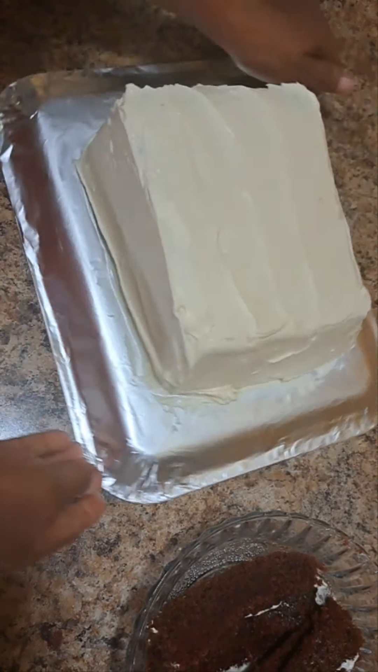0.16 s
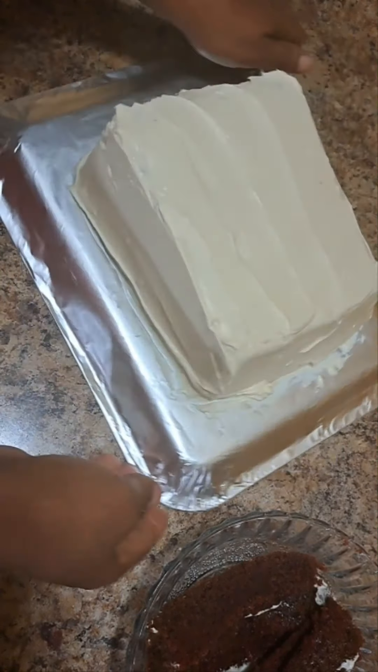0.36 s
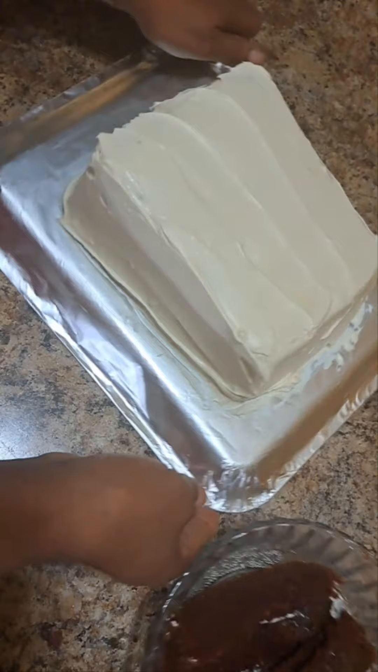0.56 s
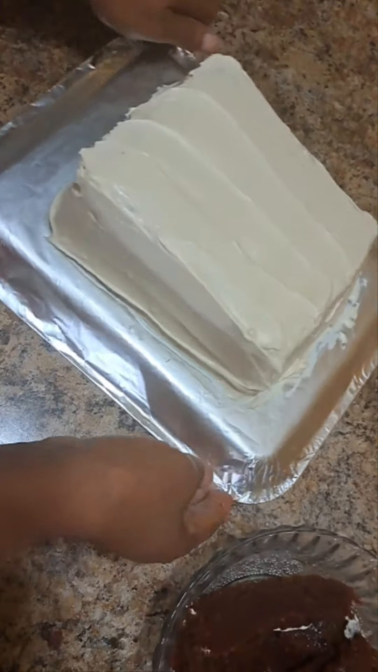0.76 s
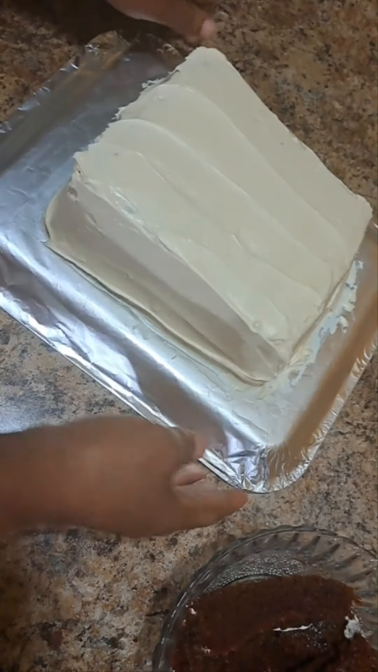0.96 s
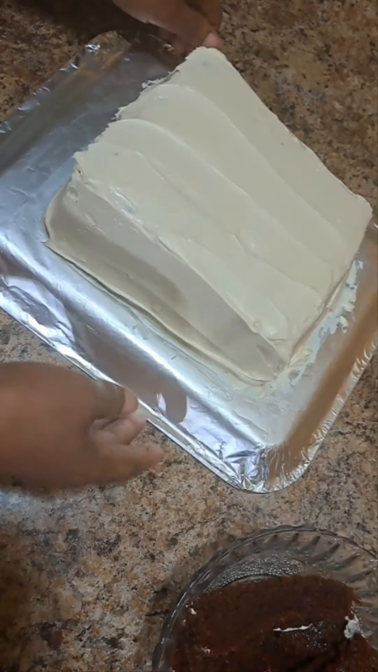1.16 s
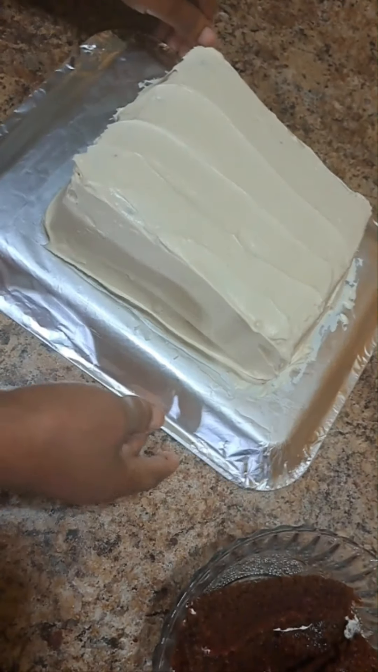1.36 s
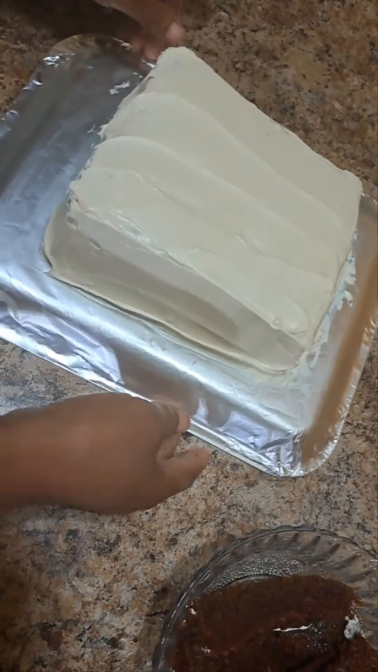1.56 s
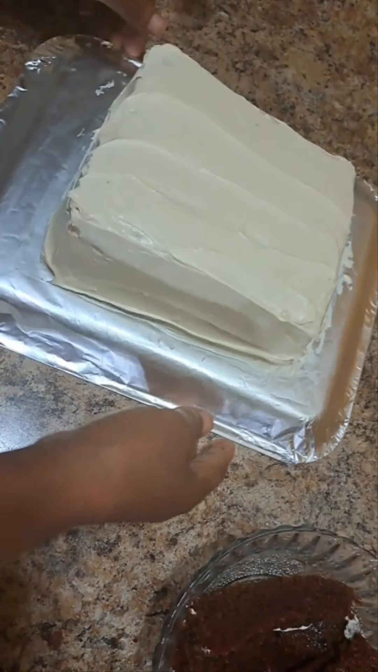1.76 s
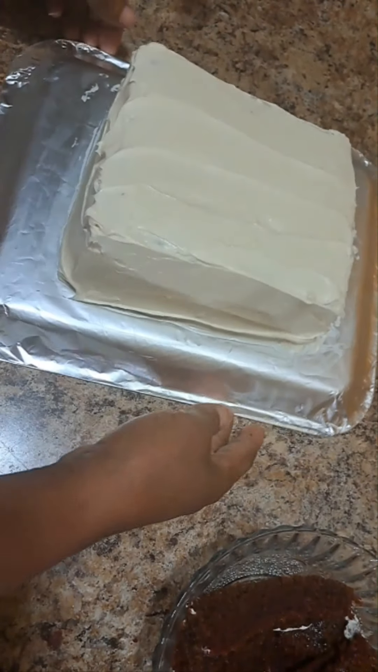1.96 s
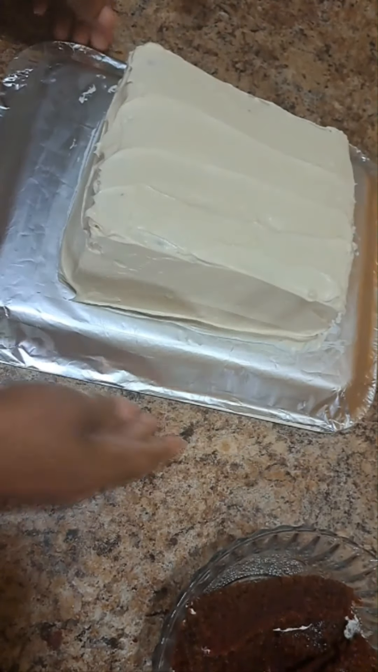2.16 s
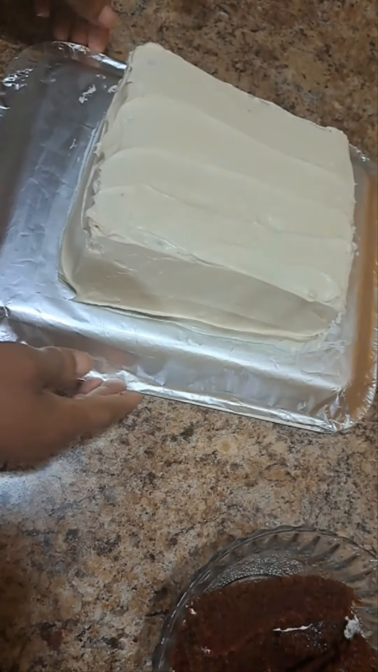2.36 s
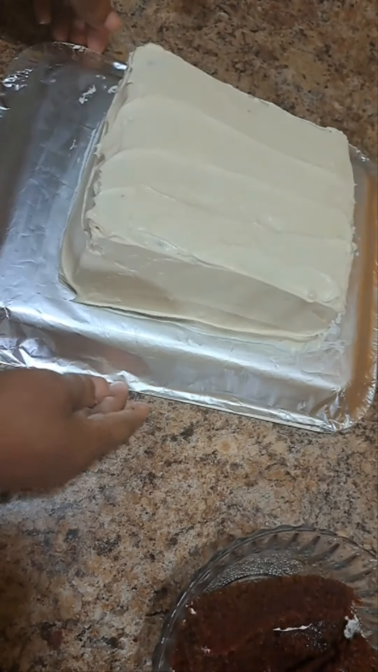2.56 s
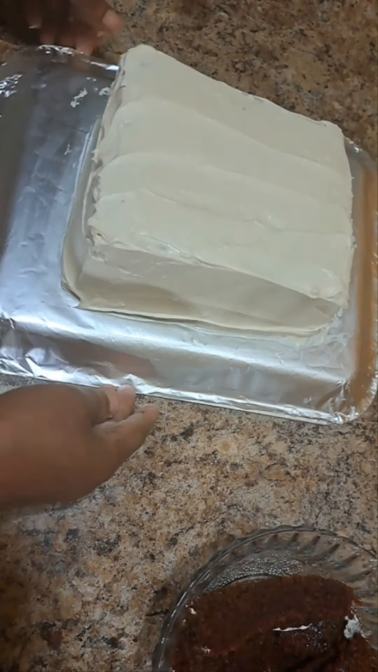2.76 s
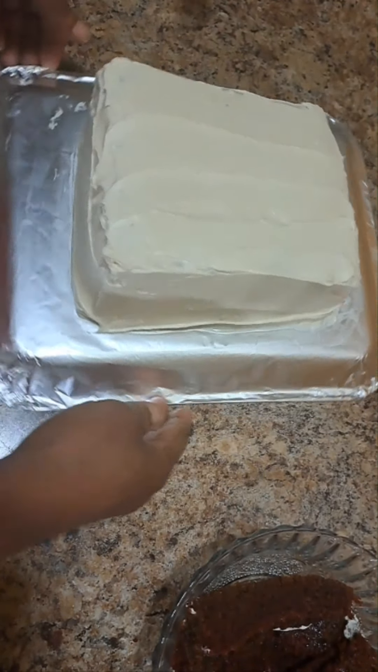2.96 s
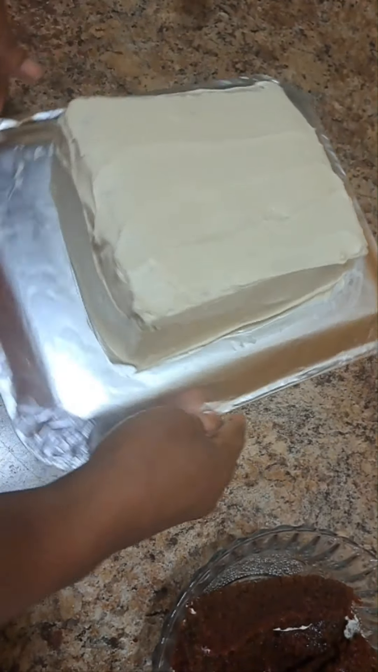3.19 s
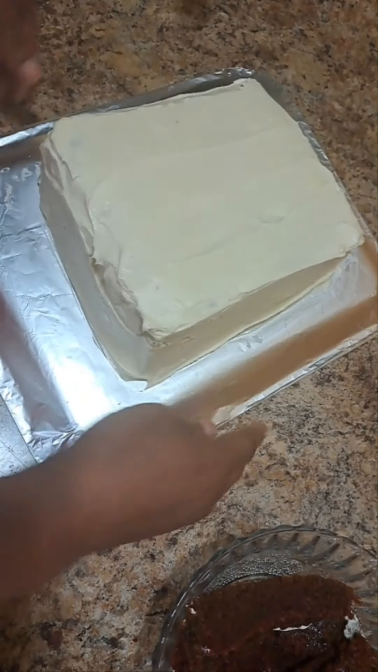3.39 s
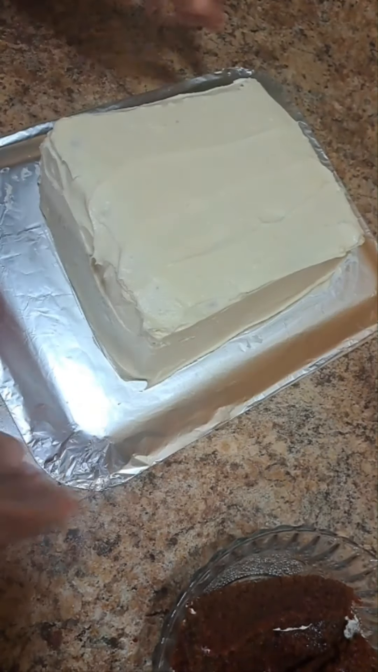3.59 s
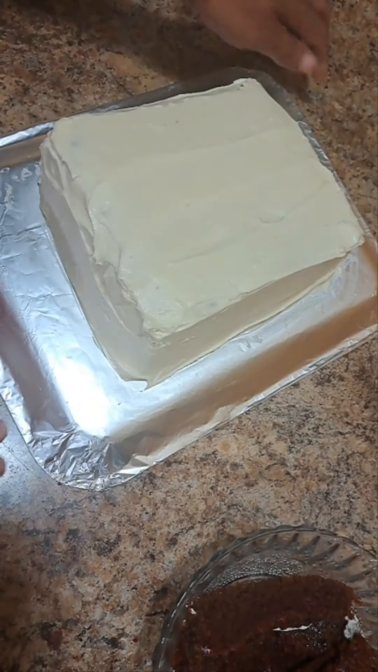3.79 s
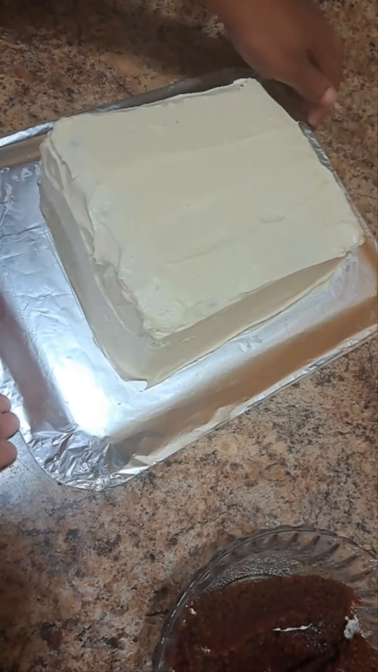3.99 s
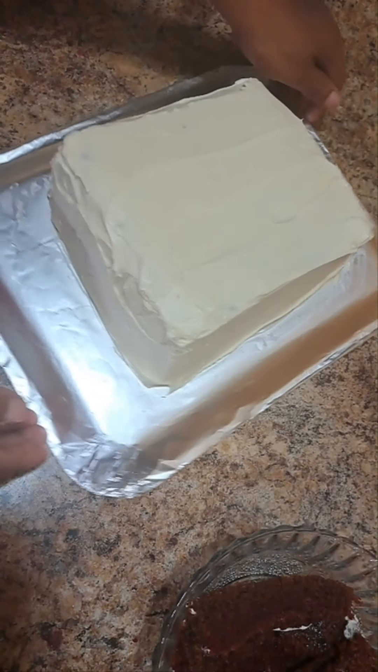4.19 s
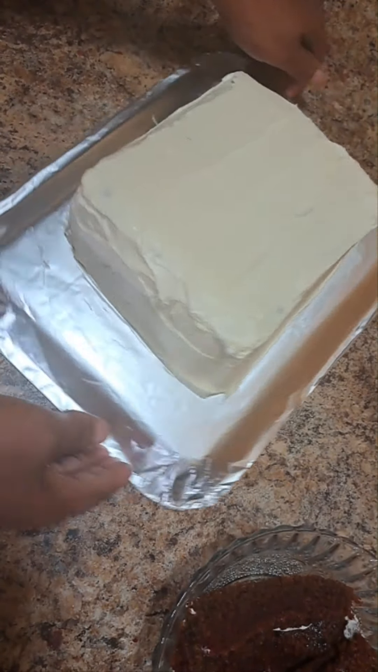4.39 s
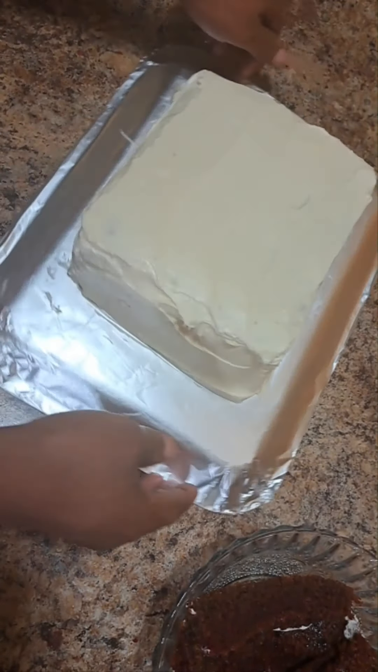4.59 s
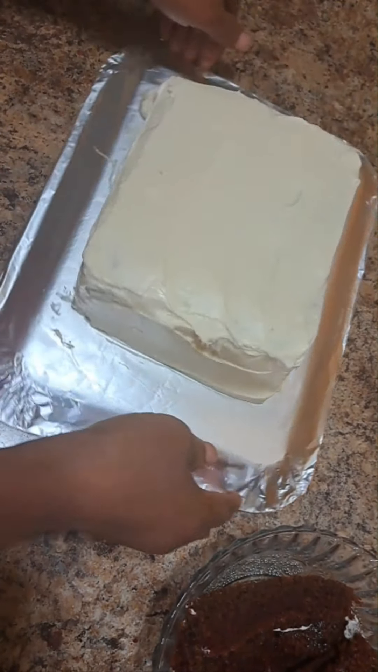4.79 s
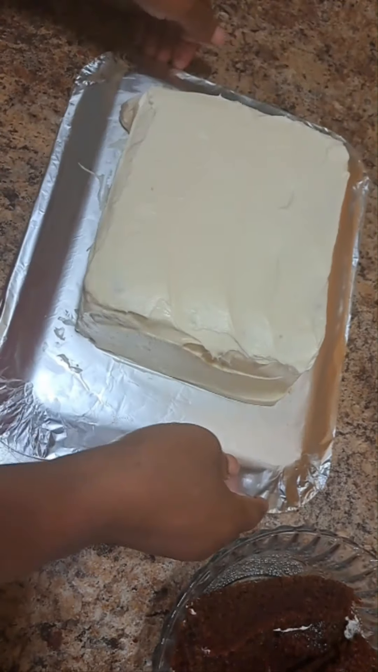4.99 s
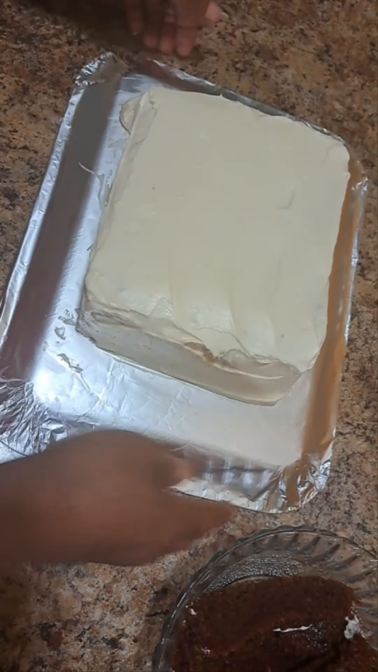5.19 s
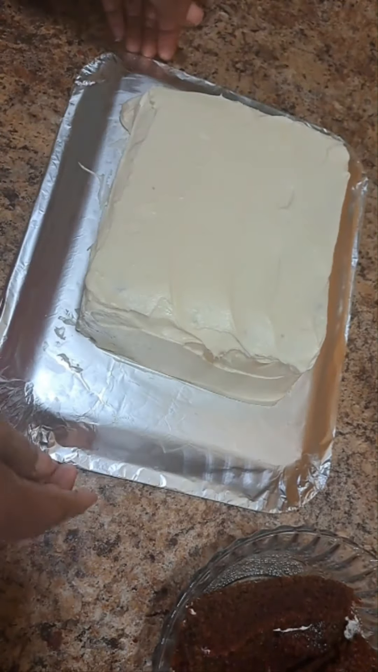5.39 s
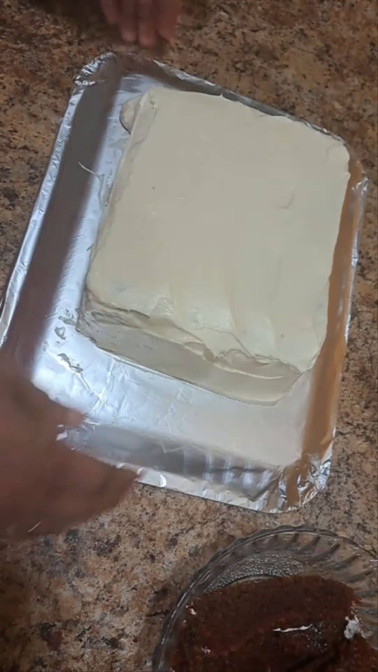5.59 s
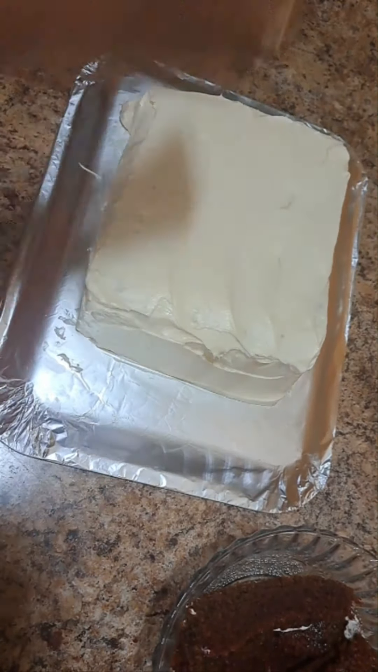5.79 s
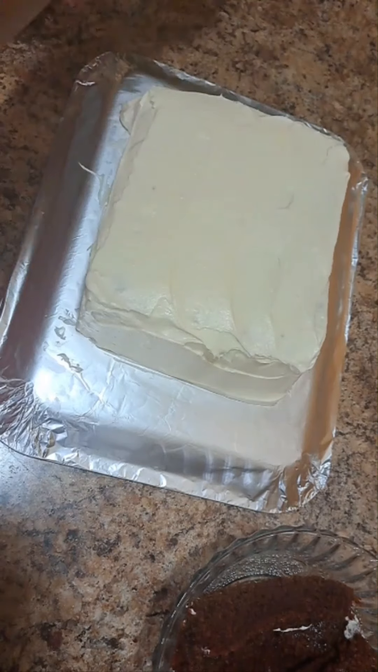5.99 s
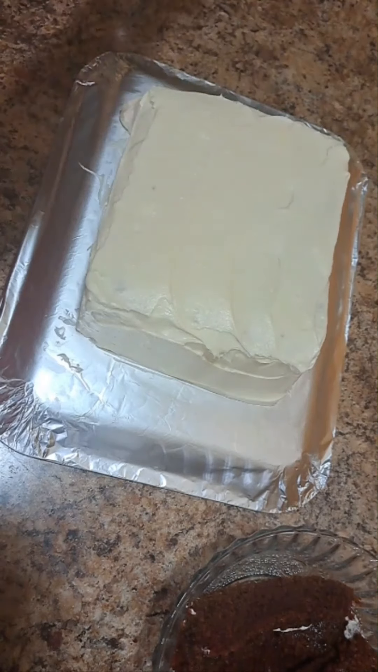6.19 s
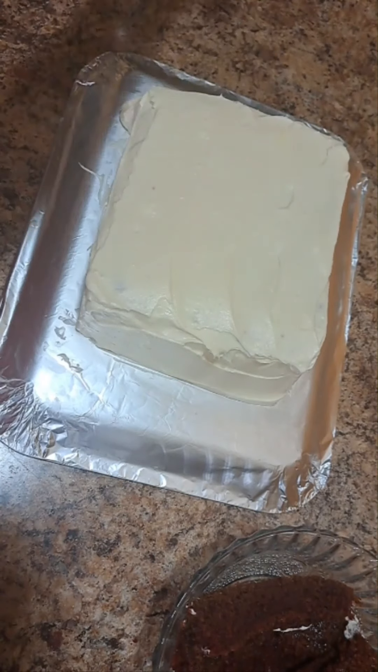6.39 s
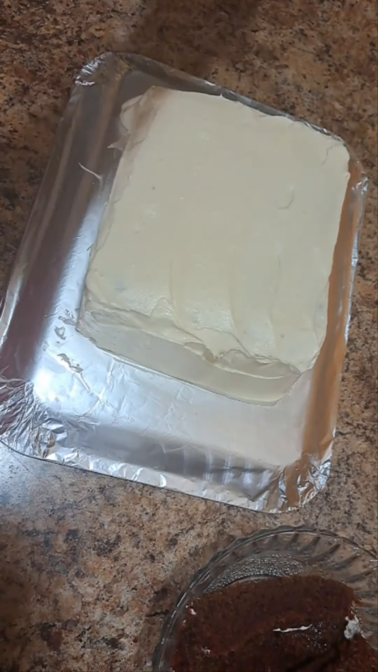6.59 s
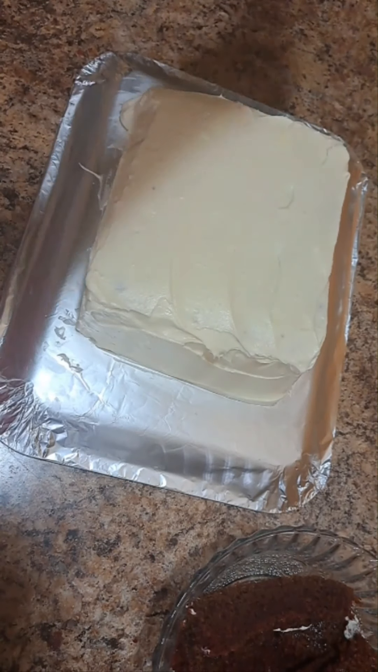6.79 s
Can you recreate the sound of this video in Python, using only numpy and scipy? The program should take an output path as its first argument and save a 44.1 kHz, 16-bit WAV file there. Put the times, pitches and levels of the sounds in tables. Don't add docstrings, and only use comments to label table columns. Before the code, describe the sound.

A foil tray holding a cake scrapes and hisses round on a stone counter, crinkling and snapping under fingers, with low thuds, then quiet.

```python
import sys
import numpy as np
from scipy import signal
from scipy.fft import rfft, irfft, next_fast_len
from scipy.io import wavfile
from scipy.ndimage import uniform_filter1d

SR = 44100
rng = np.random.default_rng(int(sys.argv[2]) if len(sys.argv) > 2 else 0)


def boost_factor(decibels):
    exponent = np.asarray(decibels, float) / 20
    return 10 ** exponent


def waveform_to_disk(signal):
    frames = np.transpose(np.atleast_2d(signal))
    scaled = np.clip(frames, -1, 1) * 32767
    samples = np.round(scaled).astype(np.int16)
    wavfile.write(sys.argv[1], SR, samples)


N = 302082
T = np.arange(N) / SR


def stereo_noise():
    return rng.standard_normal((2, N))


def level(x, db):
    return x * boost_factor(db) / np.sqrt(np.mean(x ** 2))


def decay(t, t60_s):
    return boost_factor(-60 * t / t60_s)


def pan(left_minus_right_db):
    return boost_factor(np.array([[left_minus_right_db], [-left_minus_right_db]]) / 2)


def log_axis(size):
    return np.log(np.arange(size // 2 + 1) * SR / size + 1)


def colour(x, table):
    size = next_fast_len(N)
    hz, db = np.transpose(table)
    gain = boost_factor(np.interp(log_axis(size), np.log(hz), db))
    return irfft(rfft(x, size) * gain, size)[..., :N]


def ring(x, hz, width_hz):
    return signal.lfilter(*signal.iirpeak(hz, hz / width_hz, fs=SR), x)


def ring_twice(x, hz, width_hz):
    return ring(ring(x, hz, width_hz), hz, width_hz)


def body(x, modes):
    total = 0
    for k, (hz, width_hz, db) in enumerate(modes):
        total = total + (-1) ** k * boost_factor(db) * ring_twice(x, hz, width_hz)
    return level(total, 0)


def walk(rate_hz):
    hold = int(SR / rate_hz)
    steps = np.repeat(rng.standard_normal(N // hold + 1), hold)
    return 1.01 * uniform_filter1d(steps, hold)[:N]


def curve(table):
    s, db = np.transpose(table)
    return np.interp(T, s, db)


def grit(rate_hz, spread_db, t60_s):
    sizes = boost_factor(spread_db * np.clip(rng.exponential(size=N), 0, 5.5))
    hits = (rng.random(N) < rate_hz / SR) * sizes
    pole = np.exp(-2 * np.log(1000) / (t60_s * SR))
    power = signal.lfilter([1], [1, -pole], hits ** 2)
    return level(np.sqrt(power + 1e-9), 0)


def swell(start, end, first_db, last_db, up_db_s, down_db_s):
    inside = np.interp(T, [start, max(end, start + .001)], [first_db, last_db])
    climb = up_db_s * np.clip(start - T, 0, None)
    fall = down_db_s * np.clip(T - end, 0, None)
    return boost_factor(inside - climb - fall)


# frequency in Hz, level in dB.
SIDE_OVER_MID = [(60, -13.5), (110, -16), (200, -10), (380, -8), (700, -4), (1290, 0.5), (2380, -1),
                 (4400, 0.5), (8120, 0), (15000, 0)]
# frequency in Hz, share 0-1, phase in rad.
TIED_SIDE = [(122, 0.64, -1.5), (260, 0.42, -1.5), (463, 1, 1.3), (660, 0.2, 0.5), (1030, 0.7, 1.9),
             (1660, 0, -0.5), (2920, 0, 6.5), (4870, 0, -4.5), (10300, 0.3, 7.5)]


def sides(pair, pan_db=0):
    size = next_fast_len(N)
    hz, share, phase = np.transpose(TIED_SIDE)
    share = np.clip(np.interp(log_axis(size), np.log(hz), share), 0, 1)
    phase = np.interp(log_axis(size), np.log(hz), phase)
    mid, loose = rfft(pair, size)
    mixed = share * np.exp(1j * phase) * mid + np.sqrt(1 - share ** 2) * loose
    side = colour(irfft(mixed, size)[:N], SIDE_OVER_MID)
    return np.array([pair[0] + side, pair[0] - side]) * pan(pan_db)


# full speed from and until in seconds, first and last hiss in dB, weight in dB.
PUSHES = [(0.124, 0.24, -45, -50, -9), (0.309, 0.794, -49.5, -54.5, -5.5), (0.912, 1.184, -56.5, -56.5, -4),
          (1.318, 1.492, -76, -76, 9), (1.863, 2.05, -58.5, -68, -3), (2.13, 2.24, -53, -52, -6.5),
          (2.647, 2.699, -54, -53, -10.5), (3.129, 3.476, -50, -47, -7.5), (3.515, 3.596, -48.5, -54, -4),
          (3.92, 3.94, -74.5, -81, -15), (4.593, 4.666, -48.5, -48, -5), (4.75, 5.241, -52, -55.5, -3.5),
          (5.432, 5.434, -56.5, -62.5, -12), (5.533, 5.58, -77, -79, -18), (5.86, 5.97, -71, -84, -22)]
# as for the pushes, in s, s, dB, dB, dB.
JERKS = [(0.803, 0.871, -54, -51.5, 4), (1.386, 1.41, -67, -71, 4), (1.631, 1.683, -63.5, -54, -7.5),
         (1.697, 1.807, -56, -57, -1.5), (2.333, 2.368, -63, -54, -10), (2.433, 2.5, -75, -73, 5),
         (2.573, 2.63, -60.5, -60, -3.5), (2.975, 3.053, -64, -58, -8), (3.97, 3.976, -90, -87, 19),
         (4.176, 4.19, -72, -73.5, 8.5), (4.382, 4.433, -59, -55.5, -9.5),
         (4.449, 4.522, -53.5, -50.5, -6.5), (5.64, 5.657, -66, -64.5, -4), (5.737, 5.84, -64, -76, -27)]


def pushes():
    slow_down_db_s = 159
    gains = [swell(*row[:4], 128, slow_down_db_s) for row in PUSHES]
    gains += [swell(*row[:4], 415, slow_down_db_s) for row in JERKS]
    powers = np.array(gains) ** 2
    weights = boost_factor(2 * np.transpose(PUSHES + JERKS)[4])
    return 10 * np.log10(np.array([powers.sum(axis=0), weights @ powers]) + 1e-14)


# start in seconds, length in seconds, tray dB, counter dB.
SHUDDERS = [(0.08, 0.4, -55, -60), (0.813, 0.059, -43, -47.5), (1.112, 0.0088, -54, -50),
            (1.254, 0.067, -72, -48.5), (1.38, 0.02, -56.5, -44.5), (1.657, 0.014, -57, -55),
            (2.04, 0.018, -57, -69), (2.463, 0.0088, -52.5, -50), (2.627, 0.01, -57, -49),
            (3.184, 0.042, -55, -53), (3.522, 0.046, -57, -47.5), (3.995, 0.0092, -59.5, -68),
            (4.206, 0.018, -57.5, -59), (4.47, 0.02, -52.5, -64), (4.853, 0.02, -60, -55),
            (5.203, 0.014, -55.5, -56), (5.417, 0.021, -68, -74), (5.632, 0.01, -50.5, -51),
            (5.925, 0.0087, -89, -65), (6.118, 0.0085, -92, -65), (6.24, 0.14, -69, -69.5),
            (6.531, 0.024, -48.5, -53.5), (6.838, 0.02, -89, -67)]
# time in seconds, level in dB.
LEAN = [(0.0, -51.5), (0.34, -65), (0.57, -55), (0.7, -55), (1.32, -64), (1.41, -58.5), (2.08, -58),
        (2.61, -56), (3.09, -55.5), (3.78, -67.5), (4.35, -55), (4.54, -61.5), (5.84, -69.5), (6.05, -78.5),
        (6.85, -83)]
# frequency in Hz, width in Hz, level in dB.
COUNTER_MODES = [(46.5, 17, -3), (61.8, 26, 2.5), (77.2, 21.4, -0.5), (100.2, 35, -6.5), (121.2, 32, -2),
                 (156, 44, -6.5)]
# frequency in Hz, width in Hz, level in dB.
TRAY_MODES = [(201.4, 73, -6), (287.5, 84, 3.5), (348, 49, 0), (387, 84, 2), (501.4, 76, -2),
              (670, 420, -14)]
# start in seconds, end in seconds, frequency in Hz, width in Hz, level in dB.
RINGING = [(0.0, 0.115, 298, 140, -62), (0.09, 0.167, 5260, 1800, -50), (2.57, 2.698, 900, 540, -68),
           (3.053, 3.14, 1100, 990, -74), (6.53, 6.623, 6000, 6000, -83), (4.17, 4.22, 12000, 5000, -84),
           (0.075, 0.998, 680, 250, -58.5), (0.79, 0.927, 756, 300, -61.5), (0.84, 0.978, 145, 69, -49.5),
           (0.81, 3.06, 1574, 320, -75), (3.08, 3.196, 370, 50, -61.5), (3.125, 3.214, 508, 24, -60),
           (3.137, 3.318, 1050, 330, -66), (3.25, 3.413, 498, 13, -54.5), (3.343, 3.39, 350, 76, -53),
           (3.38, 3.462, 925, 70, -58.5), (3.392, 3.485, 1410, 140, -55), (3.424, 3.516, 488.4, 6.3, -54),
           (3.466, 3.544, 1006, 130, -54), (3.477, 3.566, 331, 20, -51), (3.486, 3.557, 1440, 130, -58),
           (3.53, 3.6, 491, 30, -61), (3.66, 3.97, 8100, 850, -89), (3.903, 4.035, 282, 43, -64.5),
           (4.14, 4.216, 2570, 500, -77), (4.421, 4.514, 293, 87, -53), (4.56, 4.702, 4330, 2200, -58.5),
           (4.75, 4.812, 4400, 1800, -58), (6.48, 6.515, 504, 110, -57.5), (6.5, 6.633, 1420, 240, -76.5),
           (6.547, 6.61, 450, 170, -55), (6.648, 6.676, 1870, 940, -74.5), (6.62, 6.732, 485, 150, -75)]


def drum():
    shakes = np.array([swell(s, s + length, 0, 0, 250, 173) for s, length, *_ in SHUDDERS]) ** 2
    tray_shake, counter_shake = boost_factor(2 * np.transpose(SHUDDERS)[2:]) @ shakes
    counter_db = 10 * np.log10(counter_shake + boost_factor(2 * curve(LEAN) + 7.5))
    from_scrape = boost_factor(2 * (pushes()[1] - 0.5))
    from_counter = boost_factor(2 * (counter_db - 13))
    tray_db = 10 * np.log10(tray_shake + from_scrape + from_counter)
    counter = body(stereo_noise() * boost_factor(0.18 * walk(17)), COUNTER_MODES) * boost_factor(counter_db - 1.0)
    tray = body(stereo_noise() * grit(500, 1.87, 0.033), TRAY_MODES) * boost_factor(tray_db - 2.0)
    return sides(counter + tray + singing())


def singing():
    lead = 8192
    out, friction = np.zeros((2, N)), rng.standard_normal((2, N + lead))
    for start, end, hz, width_hz, db in RINGING:
        i = int(start * SR)
        span = slice(i, int(end * SR))
        progress = np.clip((T[span] - start) / (end - start), 0, 1)
        envelope = np.sin(np.pi * progress) ** 0.21
        note = ring_twice(friction[:, i:i + len(envelope) + lead], hz, width_hz)[:, lead:]
        out[:, span] += envelope * level(note, db)
    return out


# time in seconds, peak in dB, centre in Hz, left minus right in dB.
CLICKS = [(0.008, -46, 12000, 0), (0.119, -33.5, 5200, -5), (0.1455, -38, 13500, 0), (0.337, -36, 12500, 3),
          (0.399, -33, 9000, 0), (1.0095, -36, 7000, -2), (1.1733, -42, 9000, 2), (1.189, -50, 8500, 0),
          (1.6155, -40, 12000, 6), (1.7722, -39, 13000, 5), (1.8426, -36, 14000, -6),
          (2.1367, -36, 12500, -1), (2.3207, -39, 9000, -1), (2.3726, -31.5, 4700, 6),
          (2.595, -31.5, 12800, -1), (2.6258, -34.5, 5500, 5), (2.6825, -27.5, 13600, -4),
          (2.99, -42.5, 12800, 5), (3.325, -40, 4200, 0), (3.369, -38, 5000, -2), (3.574, -29, 11100, -1),
          (4.368, -57, 5800, -3), (4.4697, -41, 6400, 0), (4.776, -35, 4300, -2), (4.897, -41, 7000, 0),
          (5.162, -35, 8000, 0), (5.231, -41, 14000, 2), (5.2705, -34, 3620, -6), (5.381, -47, 8000, 0),
          (5.4306, -44, 6900, 0), (5.7225, -47, 13500, 0), (5.807, -51.5, 6000, -5), (5.834, -62, 4500, -5)]


def clicks():
    size = 1024
    out, t = np.zeros((2, N + size)), np.arange(size) / SR
    envelope = decay(t, 0.0083) * np.clip(t / 0.0004, 0, 1)
    for s, db, hz, pan_db in CLICKS:
        i = int(s * SR)
        noise = rng.standard_normal((2, size))
        burst = (noise + 0.91 * noise[0]) * envelope
        sound = ring(burst, hz, hz / 3.1) + 0.34 * ring(burst, 8700, 11000)
        peak = np.abs(sound).max(axis=1, keepdims=True)
        out[:, i:i + size] += boost_factor(db) * pan(pan_db) * sound / peak
    return out[:, :N]


# time in seconds, peak in dB, centre in Hz, share below 2.5 kHz in dB.
SNAPS = [(0.144, -32, 12300, -17), (0.4952, -34.5, 4600, -7.5), (1.008, -32.5, 6940, -31),
         (2.318, -29.5, 13600, -16.5), (2.347, -33, 13400, -23), (2.371, -33, 4470, -22),
         (2.528, -36, 5530, -25), (2.5317, -36.5, 12600, -21), (2.569, -29.5, 8410, -16.5),
         (2.595, -32.5, 12800, -15), (2.6246, -29, 13500, -15), (2.673, -32.5, 7500, -17),
         (2.682, -33.5, 13500, -15), (3.123, -29.5, 12900, -31), (3.5718, -27.5, 5330, -26),
         (3.596, -32, 5010, -10), (3.635, -32, 4700, -26), (3.9574, -68, 3830, -7), (4.139, -48, 8100, -30),
         (4.1475, -54, 3000, 0), (4.9915, -33.5, 11800, -32), (5.108, -34, 12900, -33),
         (5.1317, -35, 5170, -14), (5.1523, -33, 13100, -22), (5.16, -36.5, 7910, -25),
         (5.1977, -38, 12400, -18), (5.228, -37, 12900, -13), (5.2695, -33, 3530, -16),
         (5.4004, -35, 6200, -25), (5.4302, -37, 6940, -28), (5.619, -38.5, 5140, -8.5)]
# time in seconds, peak in dB, centre in Hz, left minus right in dB.
TICKS = [(1.17, -42.5, 10700, 5), (1.278, -49.5, 5250, 0), (1.3698, -48, 5900, -1), (1.381, -42, 10300, 5),
         (1.4624, -46, 5770, 2), (1.4673, -38, 5800, -3), (1.5529, -56, 10500, .6), (1.615, -45, 6400, 7),
         (1.631, -43, 5110, -1), (1.7715, -45, 5100, -1.5), (1.8415, -43, 15000, -3.5),
         (2.462, -47.5, 4990, -.6), (2.471, -46.5, 4960, 2), (2.519, -39.5, 4260, -1),
         (2.822, -55.5, 5470, -3), (3.786, -59, 11600, 7), (4.2797, -61, 8840, -1), (4.2986, -57, 7540, .6),
         (4.373, -41, 13000, 2), (4.452, -39, 12800, 1), (4.8713, -52, 11600, -3),
         (5.348, -40.5, 11800, -.6), (5.3796, -45, 5230, -8), (5.655, -48, 5290, 0),
         (5.7219, -44.5, 12700, -1), (5.8072, -54, 4890, -3), (5.814, -49.5, 12700, 1),
         (5.8324, -47.5, 5740, 2), (5.846, -48, 5840, -5), (6.526, -70, 3000, 0)]


def creases():
    big = [(s, db, hz, 0.044, low_db, -1.7) for s, db, hz, low_db in SNAPS]
    small = [(s, db, hz, 0.054, -34.5, pan_db) for s, db, hz, pan_db in TICKS]
    return sorted(big + small)


def dips_before_snaps():
    times = np.append(np.transpose(creases())[0], 99)
    until_snap_s = times[np.searchsorted(times, T)] - T
    return boost_factor(-3.2 * np.exp(-until_snap_s / 0.0071))


# frequency in Hz, density in dB per Hz.
HISS = [(2300, -35), (3650, -5.5), (5260, 1), (6470, -3.5), (8050, -3), (9030, -6.5), (12700, -0.5),
        (15000, -5), (16400, -6.5)]
# frequency in Hz, density in dB per Hz.
SCRAPE = [(360, -9), (620, -5.5), (669, -3.5), (937, -8), (1600, -12), (1950, -20.5), (2100, -12.5),
          (2730, -23.5), (4620, -120)]


def slide():
    hiss_db, scrape_db = pushes()
    hiss = level(colour(stereo_noise() * grit(2000, 2.53, 0.09), HISS), 0)
    upper = signal.sosfilt(signal.butter(2, 8500, "high", fs=SR, output="sos"), hiss)
    hiss = hiss * boost_factor(1.2 * walk(25)) + upper * (boost_factor(1.3 * walk(9)) - 1)
    scrape = level(colour(stereo_noise() * grit(1600, 1.3, 0.086), SCRAPE), 0)
    scrape = scrape * boost_factor(2.4 * walk(18))
    rasp = level(ring_twice(stereo_noise(), 2830, 3700), -3.0) * boost_factor(0.89 * walk(18))
    rasp_db = 1.21 * (np.minimum(scrape_db, hiss_db - 6) + 59.5) - 58.5
    rubbing = hiss * boost_factor(hiss_db + 0.35) + scrape * boost_factor(scrape_db - 2.5) + rasp * boost_factor(rasp_db)
    return sides(dips_before_snaps() * rubbing, pan_db=-1.5)


def snaps():
    size = 8192
    out, t = np.zeros((2, N + size)), np.arange(size) / SR
    foil = level(colour(stereo_noise(), HISS), 0)
    dull = level(ring(stereo_noise(), 1800, 4300), 0)
    crack = 0.62 * decay(t, 0.013)
    for s, db, hz, t60_s, low_db, pan_db in creases():
        i = int(s * SR)
        burst = (crack + decay(t, t60_s)) * np.clip(t / 0.0021, 0, 1)
        patch = foil[:, i:i + size]
        bright = 0.99 * patch + 1.12 * ring(patch, hz, hz / 2.8)
        sound = bright + boost_factor(low_db + 7.0) * dull[:, i:i + size]
        out[:, i:i + size] += boost_factor(db - 10) * pan(pan_db) * burst * sound
    return out[:, :N]


# time in seconds, peak in dB, pitch in Hz, t60 in seconds,
# knock above 600 Hz in dB.
BUMPS = [(1.325, -39, 106, 0.13, -22.5), (2.415, -40, 88, 0.085, -25), (2.624, -43.5, 420, 0.04, -9.5),
         (3.956, -37.5, 340, 0.066, -23), (3.968, -30.5, 132, 0.044, -39), (4.148, -26.5, 181, 0.083, -34),
         (4.16, -19.5, 156, 0.096, -34.5), (4.256, -33.5, 133, 0.044, -42), (4.354, -40.5, 125, 0.16, -37),
         (5.6, -33, 113, 0.044, -26), (5.62, -40.5, 208, 0.093, -15), (5.644, -44.5, 125, 0.2, -13),
         (5.684, -43, 129, 0.059, -31), (5.719, -55, 149, 0.1, -27), (6.112, -56, 69, 0.07, -38),
         (6.516, -36.5, 285, 0.079, -33)]


def bumps():
    size = 16384
    out, t = np.zeros((2, N + size)), np.arange(size) / SR
    for s, db, hz, t60_s, knock_db in BUMPS:
        i = int(s * SR)
        turn = 2 * np.pi * hz * t
        tone = np.sin(turn) + 0.3 * np.sin(1.42 * turn) + 0.064 * np.sin(3.15 * turn)
        tone = tone * decay(t, t60_s) * np.clip(t / 0.0028, 0, 1)
        knock = ring(ring(rng.standard_normal((2, size)), 660, 1200), 860, 1800)
        knock = level(knock, knock_db - 0.5) * decay(t, 0.079)
        out[:, i:i + size] += boost_factor(db - 1.7) * (tone * [[1], [.04]] + knock)
    return sides(out[:, :N])


# time in seconds, level in dB.
HUM = [
    (2.5, -72),
    (2.7, -52.5),
    (3.27, -49),
    (3.37, -56),
    (3.49, -50),
    (3.58, -58.5),
    (4.42, -61),
    (4.55, -53.5),
    (5.05, -67.5),
]


def hum():
    start, end = HUM[0][0], HUM[-1][0]
    edges = np.clip(np.minimum(T - start, end - T) / 0.065, 0, 1)
    pitch_hz = 125.3 + 3.7 * walk(13)
    note = np.sin(2 * np.pi * np.cumsum(pitch_hz) / SR) * boost_factor(1.2 * walk(21.01))
    return sides(note * edges * boost_factor(curve(HUM) + 3.0) * [[1], [.04]])


def room(x):
    t = np.arange(int(.6 * SR)) / SR
    tail = rng.standard_normal((2, len(t))) * decay(t, 0.34) * np.clip(t / 0.0044, 0, 1)
    tail = signal.sosfilt(signal.butter(1, [450, 8300], "band", fs=SR, output="sos"), tail)
    tail = tail * boost_factor(-12) / np.sqrt(np.sum(tail ** 2, axis=1, keepdims=True))
    return signal.fftconvolve(x, tail, axes=1)[:, :N]


# frequency in Hz, density in dB per Hz.
QUIET = [(18, -33), (30, -1), (161, -4), (345, -6.5), (666, -25), (937, -17), (1250, -21), (1630, -16),
         (3140, -30.5), (3490, -31), (5900, -28), (12300, -29.5), (16000, -31)]


def quiet():
    return sides(level(colour(stereo_noise(), QUIET), -72.5)) * boost_factor(0.14 * walk(1.6))


def scene():
    sharp = clicks() + snaps() + bumps()
    return drum() + slide() + hum() + sharp + room(sharp) + quiet()


def roll_off(x):
    return signal.sosfilt(signal.butter(12, 16970, fs=SR, output="sos"), x)


def record(dry):
    bass = signal.butter(2, 36, "high", fs=SR, output="sos")
    top = signal.ellip(6, .3, 32, 15900, fs=SR, output="sos")
    return roll_off(signal.sosfilt(np.vstack([bass, top]), dry))


dry = scene()
out = record(dry)
waveform_to_disk(out)
```